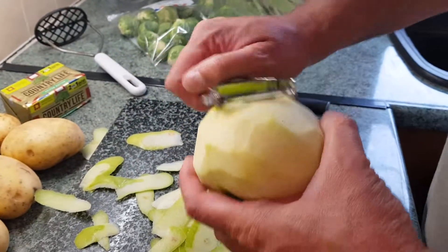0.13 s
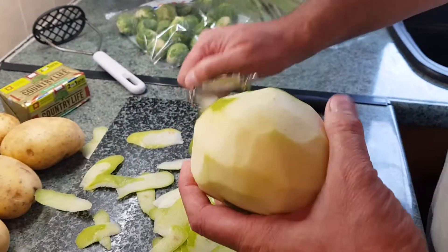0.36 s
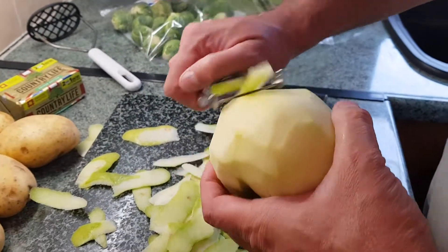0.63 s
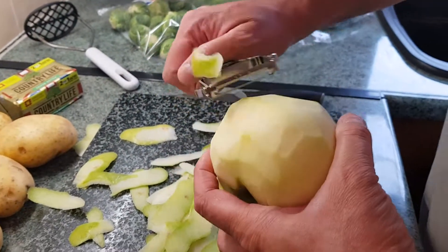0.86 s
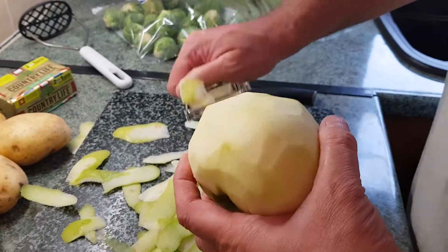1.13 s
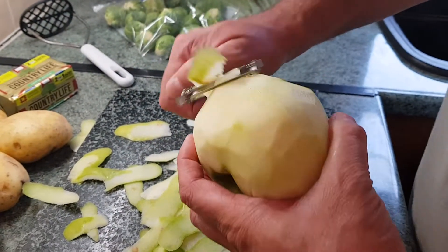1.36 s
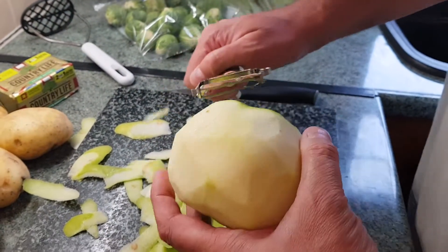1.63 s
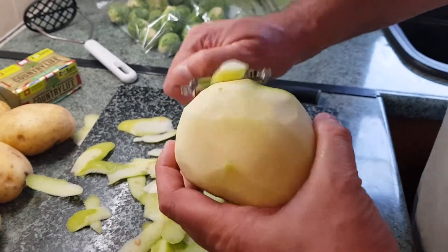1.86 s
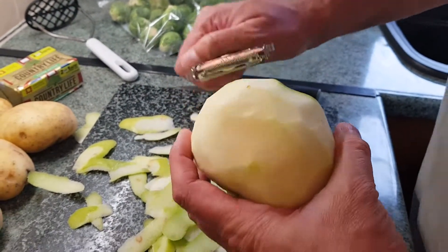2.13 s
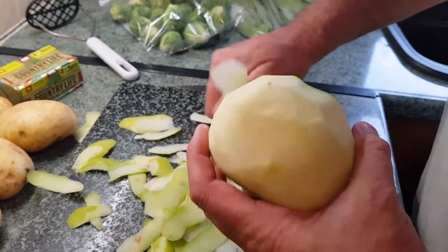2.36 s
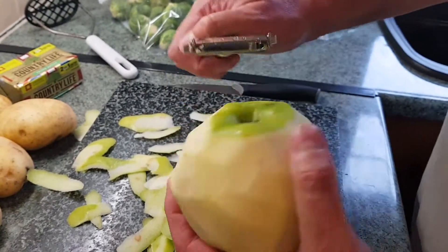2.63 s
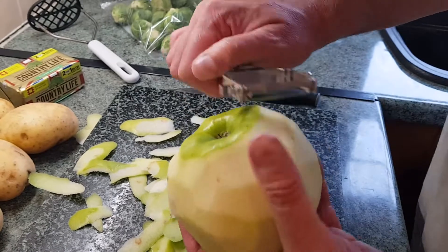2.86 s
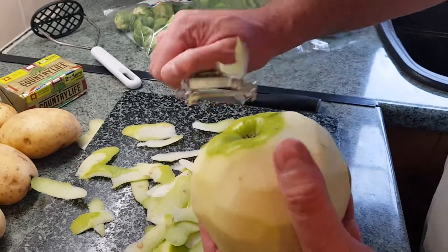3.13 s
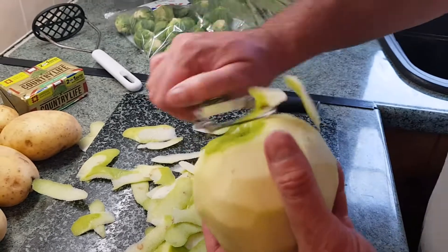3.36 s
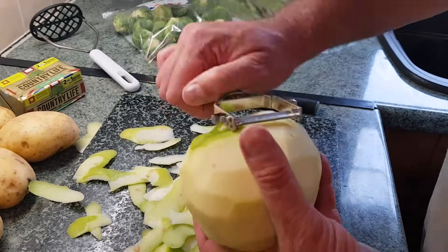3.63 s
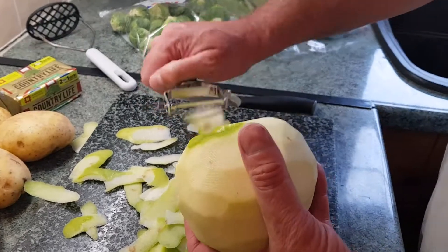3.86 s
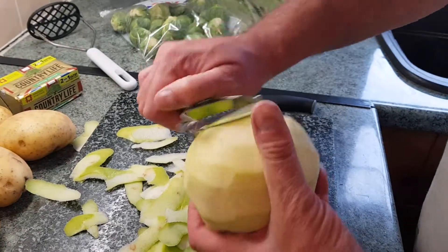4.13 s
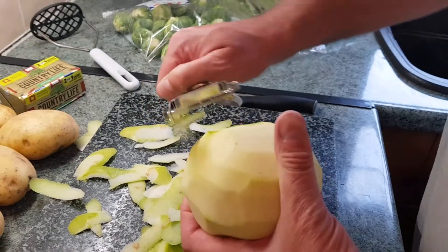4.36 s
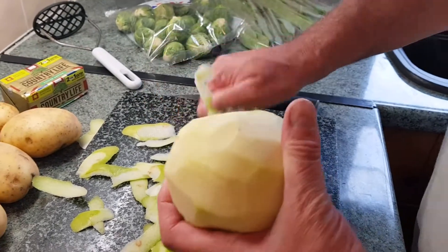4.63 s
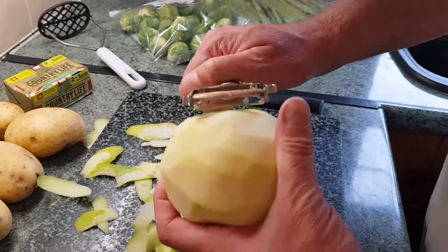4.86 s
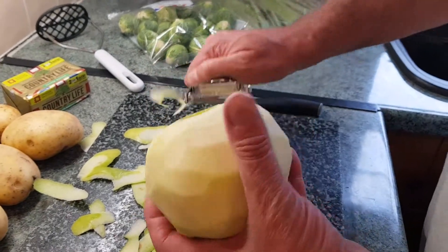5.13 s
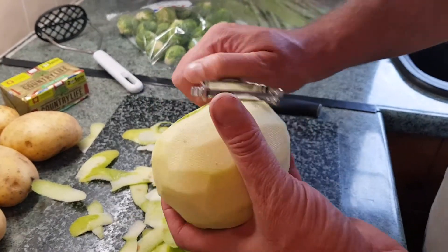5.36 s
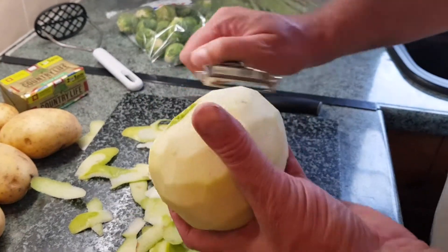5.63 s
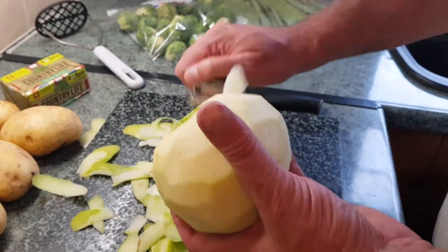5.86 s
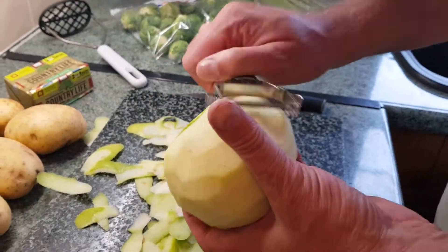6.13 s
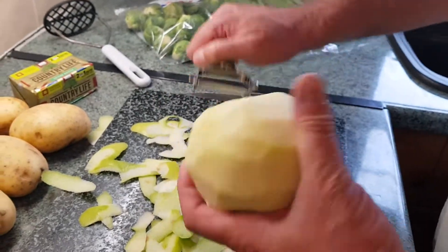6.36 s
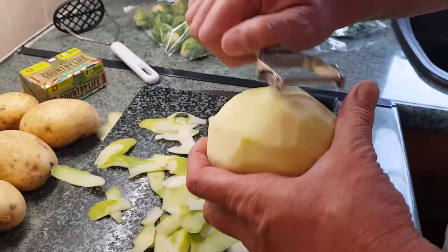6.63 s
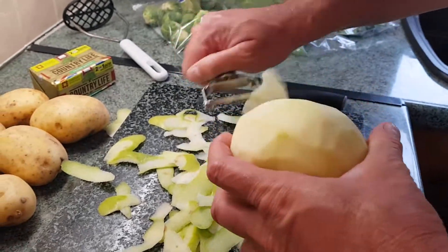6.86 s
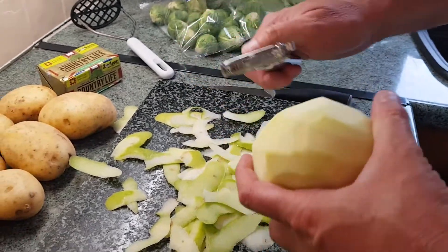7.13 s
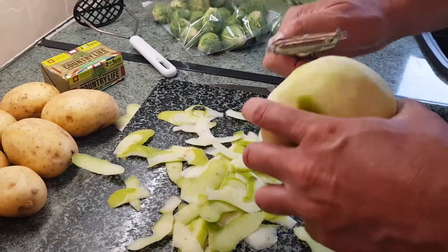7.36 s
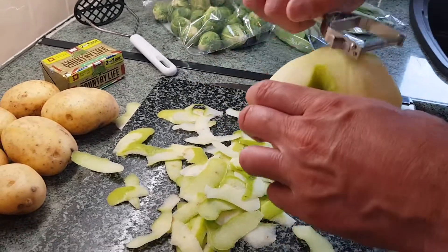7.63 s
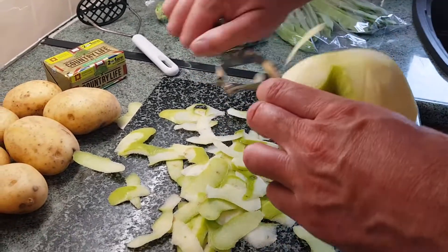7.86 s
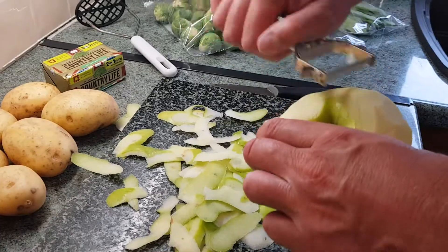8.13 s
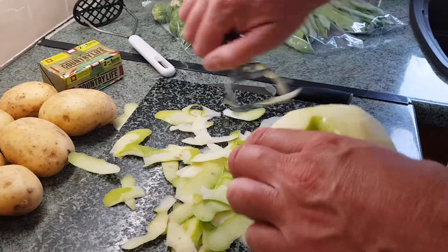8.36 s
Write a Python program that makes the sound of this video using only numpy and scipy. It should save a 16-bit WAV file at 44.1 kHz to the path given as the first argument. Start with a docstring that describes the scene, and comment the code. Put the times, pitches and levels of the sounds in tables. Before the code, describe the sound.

A loose-bladed metal peeler shaves a firm apple in quick, crisp, rasping strokes with small metallic rattles, over a faint fridge hum.

```python
"""A steel swivel peeler shaves an apple on a stone worktop, close to a two-port microphone.
Each stroke tears fruit cells: random impulses excite the resonances of blade and hollow-sounding apple.
The loose blade chatters in its pivots (short swarms of contacts) and rustles with wet peel between cuts.
A faint whistle and an early drone pass; a fridge hums, its motor beating against the mains, over room noise.
"""
import sys
import numpy as np
from scipy import signal
from scipy.fft import rfft, irfft, next_fast_len
from scipy.io import wavfile
from scipy.ndimage import uniform_filter1d, map_coordinates

SR = 44100
rng = np.random.default_rng(int(sys.argv[2]) if len(sys.argv) > 2 else 0)


def to_wav(sig):
    """Store sig (one row per channel, or 1-D mono) as 16-bit WAV at the path in sys.argv[1].

    Samples outside -1..1 are clipped; the rate is SR.
    """
    pcm = np.clip(np.atleast_2d(sig), -1, 1) * 32767
    pcm = np.round(pcm).astype(np.int16)
    wavfile.write(sys.argv[1], SR, pcm.T)  # frames by channels


def ratio(d):
    """dB to gain"""
    e = np.asarray(d, float) / 20
    return 10 ** e


N = 374850

# Apple and hand resonances, the three low ones first.
# Each row: centre in Hz, width in Hz, peak gain in dB (relative).
APPLE_MODES = [(720, 198, -8.5), (871, 38, 0.5), (1135, 170, -5), (1483, 200, -9.5), (1800, 250, -6),
               (2053, 184, -1.5), (2537, 750, -5.5)]


def unit(x):
    """Scaled to rms 1."""
    return x / np.sqrt(np.mean(x ** 2) + 1e-20)


def along(points, hz):
    """(Hz, value) points interpolated on a log frequency axis."""
    point_hz, value = np.transpose(points)
    return np.interp(np.log(hz + 1), np.log(point_hz + 1), value)


def wobble(rate_hz):
    """A smooth random curve with rate_hz knots a second."""
    knots = rng.standard_normal(int(N * rate_hz / SR) + 4)
    return map_coordinates(knots, [np.arange(N) * rate_hz / SR])


def filtered(x, response):
    """x times a complex response of frequency."""
    size = next_fast_len(N + SR // 2)
    spectrum = rfft(x, size) * response(np.fft.rfftfreq(size, 1 / SR))
    return irfft(spectrum, size)[..., :N]


def resonant(x, modes):
    """x through parallel causal second-order resonances of alternating sign."""
    def response(f):
        total = 0
        for k, (centre_hz, width_hz, db) in enumerate(modes):
            damping = 1j * f * width_hz
            total = total + (-1) ** k * ratio(db) * damping / (centre_hz ** 2 - f * f + damping)
        return total
    return filtered(x, response)


def grit(rate_hz, scatter_db):
    """Dense random impulses of uneven size, rms 1."""
    struck = rng.random(N) < rate_hz / SR
    size = ratio(scatter_db * np.minimum(rng.exponential(size=N), 5))
    return unit(struck * rng.standard_normal(N) * size)


def strokes():
    """Gains of blade, deep and crisp flesh from cuts and rustles; smoothed 0-1 mark of the cutting."""
    # Peeling cuts. Each row: edge enters, deepest, edge leaves in seconds; blade scrape on entry and
    # at the deepest in dB; deep and crisp flesh over the blade at the deepest in dB.
    cuts = [(.13, 0.23, 0.29, -42, -32.5, -5, -5.5), (0.581, 0.665, .69, -36, -30, -11.5, -6.5),
            (0.953, 1.039, 1.066, -37.5, -29.5, -7, -5), (1.332, 1.414, 1.448, -32, -31.5, -9.5, -5),
            (1.827, 1.9, 1.937, -32, -32.5, -5, -5.5), (2.238, 2.344, 2.373, -34, -34.5, -5.5, -3),
            (2.935, 3.015, 3.03, -32.5, -35, -0.5, -5), (3.295, 3.385, 3.4, -34, -35.5, -3.5, -2),
            (3.654, 3.747, 3.778, -40.5, -31.5, -3.5, -2.5), (4.087, 4.174, 4.223, -38.5, -36, -4, -3),
            (4.476, 4.59, 4.615, -36, -33.5, -5, -4.5), (4.918, 4.995, 5.043, -47.5, -30, -5, -2.5),
            (5.354, 5.42, 5.44, -30.5, -34.5, -10, -4.5), (5.735, 5.805, 5.84, -48, -32.5, -8, -2),
            (6.15, 6.245, 6.27, -35, -34, -10, -4), (6.69, 6.79, 6.825, -39, -31, -8, -3.5),
            (7.725, 7.798, 7.825, -46.5, -33.5, -10, -1.5), (8.227, 8.302, 8.39, -49.5, -35.5, -7, -0.5)]
    # Loose blade and wet peel, each until the next cut.
    # Each row: start in seconds, level in dB, fade in dB per second (negative grows).
    rustles = [(0, -44, 185), (.115, -40, 300), (.335, -41, 195), (.5, -53, 98), (.7, -43, 90),
               (.915, -49.5, 500), (1.1, -36.5, 200), (1.21, -53, 150), (1.45, -39.5, 133),
               (1.689, -50.5, 500), (1.95, -50, 80), (2.4, -42, 110), (3.045, -42, 124), (3.235, -44, 503),
               (3.41, -40, 134), (3.8, -47, 118), (4.22, -40, 188), (4.365, -53.5, -27),
               (4.625, -39.5, 203), (4.69, -52, 160), (4.905, -38, 600), (5.025, -41, 131),
               (5.46, -41, 147), (5.661, -33, 230), (5.855, -45, 153), (6.035, -48, 350), (6.285, -42, 146),
               (6.549, -48.5, 190), (6.83, -40, 300), (6.89, -42, 200), (7.11, -42, 400),
               (7.155, -48.5, 390), (7.32, -58, 497), (7.375, -62, 60), (7.675, -37, 185),
               (7.846, -35, 200), (8.01, -59.5, 103), (8.4, -56.5, -150)]
    enter_s, leave_s, swing_db = 0.015, 0.012, 22  # ramps outside a cut, and their depth
    leaving_db = -2.5  # blade as the edge leaves, over the deepest point
    # flesh share on entry and exit, over its share at the deepest point
    deep_entry_db, deep_exit_db = -7, -17.5
    crisp_entry_db, crisp_exit_db = -0.5, -14.5
    rustle_rise_s, uneven_db = 0.009, 1.5 * wobble(30)
    rustle_share_db = [[0], [-16.5], [-13]]  # blade, deep, crisp

    t = np.arange(N) / SR
    gains, cutting = np.zeros((3, N)), np.zeros(N)
    for enter, deepest, leave, entry_db, full_db, deep_db, crisp_db in cuts:
        now = slice(round((enter - enter_s) * SR), round((leave + leave_s) * SR))
        knots_s = [enter - enter_s, enter, deepest, leave, leave + leave_s]
        exit_db = full_db + leaving_db

        def shape(a, b, c):
            return np.interp(t[now], knots_s, [a - swing_db, a, b, c, c - swing_db])
        blade = shape(entry_db, full_db, exit_db)
        deep = shape(entry_db + deep_db + deep_entry_db, full_db + deep_db,
                     exit_db + deep_db + deep_exit_db)
        crisp = shape(entry_db + crisp_db + crisp_entry_db, full_db + crisp_db,
                      exit_db + crisp_db + crisp_exit_db)
        gains[:, now] += ratio([blade, deep, crisp])
        cutting[round(enter * SR):round(deepest * SR)] = 1

    for start, db, fade in rustles:
        stop = min([cut[0] for cut in cuts if cut[0] > start] + [N / SR])
        now = slice(round(max(start - rustle_rise_s, 0) * SR), round(stop * SR))
        rise = np.clip(1 + (t[now] - start) / rustle_rise_s, 0, 1)
        level = rise * ratio(db - fade * (t[now] - start) + uneven_db[now])
        gains[:, now] += level * ratio(rustle_share_db)
    return gains, uniform_filter1d(cutting, size=SR // 25)


def steel(force, hiss_db):
    """A force rings the blade; the contact also hisses, from its own random pattern of points."""
    # Blade and frame resonances. Each row: centre in Hz, width in Hz, peak gain in dB (relative).
    blade_modes = [(3593, 200, 3), (3873, 81, 2), (4220, 200, -9.5), (4870, 200, -1.5), (5120, 430, -14.5),
                   (6190, 140, 1), (9340, 370, -18), (10440, 150, -11.5), (11610, 210, -1.5),
                   (14000, 300, -4.5), (15160, 520, -2)]
    # Hiss of tearing cells. Each row: frequency in Hz, density in dB per Hz (relative).
    hiss_spectrum = [(1290, -54.5), (2200, -14), (2920, -10.5), (3710, 3), (4310, -3), (4800, 1),
                     (6260, -8), (7710, -14.5), (11500, -6.5), (15000, -10), (16000, -48)]

    def colour(hz):
        return ratio(along(hiss_spectrum, hz))
    hiss = filtered(force * rng.choice([-1, 1], N), colour)
    impulse = np.eye(1, N)[0]
    scale = np.std(resonant(impulse, blade_modes)) / np.std(filtered(impulse, colour))
    return resonant(force, blade_modes) + ratio(hiss_db) * scale * hiss


def scrape():
    """Cells burst under the edge in clumps; the flesh answers lower than the steel."""
    (blade_gain, deep_gain, crisp_gain), cutting = strokes()
    slip_db = 1.03 * wobble(150)  # the edge catches and lets go
    blade = unit(steel(grit(14000, scatter_db=1.46) * ratio(slip_db), hiss_db=3))
    tearing = grit(4000, scatter_db=0.86) * ratio(slip_db + 1.3 * wobble(45))
    deep = unit(resonant(tearing, APPLE_MODES[:3]))
    crisp = unit(resonant(tearing, APPLE_MODES[3:]))
    cut = blade_gain * blade + deep_gain * deep - crisp_gain * crisp
    cut_pan_db, free_pan_db = -0.1, -1.5  # left over right, on and off the apple
    return cut, free_pan_db + (cut_pan_db - free_pan_db) * cutting


def chatter():
    """Each jolt is a swarm of metal contacts with a knock in the fruit; the point hit sets the colour."""
    # Each row: start in seconds, low blade modes in dB, apple knock over them in dB,
    # treble over them in dB, length in seconds.
    jolts = [(0.092, -39, -8.5, 3.5, .014), (0.104, -38.5, -6, 1, .014), (0.3256, -46, -6, 5, 0.013),
             (0.34, -41, -14, 0.5, .013), (0.498, -52, -12, 4, .016), (0.557, -33, -8, 1, 0.012),
             (0.566, -20.5, -22, .5, 0.02), (.6309, -39, -8, -9, 0.021), (.7254, -44.5, -21, 2.5, 0.035),
             (0.773, -44.5, -20, 0.5, 0.035), (0.943, -26.5, -14, -3, 0.016), (0.992, -36, -2, -3, 0.028),
             (1.0489, -35, -22, 4, .0127), (1.102, -42.5, -20, 4.5, 0.042), (1.2133, -42.5, -2, 4.5, .007),
             (1.3174, -31, -17, 0, 0.0089), (1.3283, -29.5, -5, 1.5, 0.0079), (1.4245, -32, -25, 7.5, .02),
             (1.686, -56.5, 0, -2, .0099), (1.799, -34, -13, 3, .019), (1.8137, -22.5, -4, -1.5, 0.0067),
             (1.9265, -28, -19, 1.5, 0.011), (2.023, -47, -7, -2, .013), (2.203, -42, -13, 1, 0.044),
             (2.2266, -27.5, 4.5, 5, 0.0094), (2.362, -37, -18, 1, 0.03), (2.4303, -41, -15, -1, 0.021),
             (2.8856, -48, -13, 1, 0.017), (2.9064, -32, -14, 0, .012), (2.917, -23.5, -16, -3, 0.0076),
             (2.9224, -26, -10.5, -2.5, 0.023), (2.937, -23.5, -5, -1, 0.01), (2.974, -33, -3, -11, .024),
             (3.03, -31, -20, -2, .022), (3.2334, -42.5, -21, -8, 0.016), (3.2718, -21.5, -10, -3, .014),
             (3.2826, -21.5, -5, 1.5, 0.011), (3.4016, -28, -25, -1.5, 0.014), (3.615, -54, -6, -2, .012),
             (3.624, -32, -8, -1.5, 0.014), (3.635, -25.5, -14, -2, 0.016), (3.783, -37.5, -10, 5.5, .0111),
             (3.828, -47, -12, 4, 0.016), (3.8654, -45, -7, -6, .012), (4.059, -29, -11.5, 1, .016),
             (4.072, -25.5, -7, -5.5, 0.013), (4.15, -34, -2, -14, 0.019), (4.2, -37.5, -12, 0, 0.012),
             (4.2915, -43, -9, -4, 0.012), (4.356, -50, -20, -6, .012), (4.3714, -47, -25, -3, .0117),
             (4.3984, -49, -22, -2, 0.027), (4.4433, -36.5, -8, 1, 0.021), (4.4617, -28.5, -17, 3.5, 0.01),
             (4.4925, -27, -26, -2.5, 0.01), (4.555, -33, -2.5, -9, 0.028), (4.605, -34, -20, 1, 0.03),
             (4.6554, -43, -17, 0, 0.019), (4.692, -29.5, -21, -3, 0.011), (4.748, -41.5, -16, -5, .0091),
             (4.8915, -39.5, -10, 3.5, 0.022), (4.949, -39, 0.5, -14, 0.033),
             (4.987, -23, -10.5, -3, .0095), (5.034, -34, -15, .5, 0.011), (5.088, -43, -8, 2, 0.023),
             (5.312, -43, -20, -1, .018), (5.3322, -29, -16, -0.5, .0075), (5.341, -27, -17, -0.5, 0.022),
             (5.4439, -35.5, -13, 2, 0.017), (5.495, -40, -19, 2.5, 0.025),
             (5.6468, -29.5, -18, -1.5, 0.018), (5.7086, -37.5, -7.5, 0.5, 0.0084),
             (5.76, -38, 1.5, -8, 0.03), (5.838, -31.5, -24, .5, 0.018), (5.898, -48, -9, 2, 0.0084),
             (6.036, -45, -20, 3.5, 0.012), (6.113, -33, -12.5, 0.5, .018), (6.1297, -23, -15, 0.5, 0.015),
             (6.273, -27.5, -19, -2, 0.0097), (6.34, -44, -9, 1, 0.015), (6.55, -44, -27, -4, 0.0083),
             (6.649, -37.5, -10.5, 0, 0.038), (6.671, -26.5, -15, -3, 0.01), (6.823, -34, -11, -7, .012),
             (6.878, -39, -21, 2, 0.029), (6.92, -44, -20, 1, .02), (7.0965, -39, -30, -4, .02),
             (7.156, -45, -15, 1.5, 0.014), (7.286, -58, -8, 0, .019), (7.3645, -34, -7, 0.5, .0045),
             (7.4386, -57, -10, -7, .02), (7.606, -56, -3, -6, .0149), (7.632, -38, -22, -5, 0.028),
             (7.6626, -25.5, -11.5, -3.5, 0.0097), (7.7567, -36.5, -1, -10, 0.024),
             (7.7791, -35, -7, -13, 0.038), (7.829, -26, -15, -3.5, 0.012), (8.001, -51.5, -7, -11, .0148),
             (8.221, -45, -14, -2, 0.017), (8.236, -41, -11, 2, 0.013), (8.265, -40.5, -.5, -9, .024),
             (8.295, -35.5, 0, -20, 0.036), (8.35, -37, -10, -9, .0142)]
    attack_share = 0.025  # rise time constant over length
    first_touch_db, sharp_s = 10.5, 0.0079  # first contact stands out, the more the shorter the jolt
    bands_hz = [(2200, 5120), (5400, 6740), (7400, 14500)]  # low modes, upper ring, treble

    t = np.arange(SR // 10) / SR
    force = np.zeros((4, N + len(t)))
    for start, db, knock_db, treble_db, length in jolts:
        # the upper ring follows the treble; contact with the apple damps it
        ring_db = -4 + 0.9 * treble_db - 0.12 * (knock_db + 10)
        decay = np.exp(-(t / np.clip(length, 0.002, 0.04)) ** 2.66)
        shape = decay * (1 - np.exp(-t / (attack_share * length)))
        first_touch = np.exp(-(length / sharp_s) ** 2 - t / 0.00066)
        shape = shape * (1 + ratio(first_touch_db) * first_touch)
        part_db = db + np.array([[knock_db], [0], [ring_db], [treble_db]])
        force[:, round(start * SR):][:, :len(t)] += ratio(part_db) * shape

    contacts = grit(12000, scatter_db=0.84)
    out = resonant(force[0, :N] * contacts, APPLE_MODES) / np.std(resonant(contacts, APPLE_MODES))
    for push, edges_hz in zip(force[1:, :N], bands_hz):
        band = signal.butter(2, edges_hz, "band", fs=SR, output="sos")

        def ring(x):
            return signal.sosfilt(band, steel(x, hiss_db=-1.0))
        out = out + ring(push * contacts) / np.std(ring(contacts))
    return out


def echoes(t60_s, length_s, count):
    """Random decaying responses of energy 1, count of them for each port."""
    noise = rng.standard_normal((count, 2, round(length_s * SR)))
    hz, t, z = signal.stft(noise, SR, nperseg=64)
    tail = signal.istft(z * ratio(-60 * t / t60_s(hz)[:, None]), SR, nperseg=64)[1]
    return tail / np.linalg.norm(tail, axis=-1, keepdims=True)


def kitchen(x, pan_db):
    """Moving hands and the worktop scatter the sound ever anew into each port; the walls answer later."""
    # Each row: frequency in Hz, reverberation time t60 in seconds.
    wall_t60 = [(500, 0.48), (3000, 0.43), (8000, 0.38), (15000, 0.17)]
    hop = 2048
    count = N // hop + 2
    near = ratio(-2) * echoes(lambda hz: 0.025 + 0 * hz, 0.02, count=count)
    # direct sound: the moving hand is nearer one port than the other
    lag_samples = rng.integers(0, 9, size=count)
    near[:, 0, 1] += ratio(-4.5)
    near[np.arange(count), 1, lag_samples] += ratio(-4.5)
    far = echoes(lambda hz: along(wall_t60, hz), 0.45, count=8)
    far = np.pad(far, ((0, 0), (0, 0), (250, 0)))  # delay in samples

    padded = np.pad(x, (hop, 3 * hop))
    fade = np.sin(np.pi * np.arange(2 * hop) / (2 * hop)) ** 1.49
    close, walls = np.zeros((2, 2, N + SR))
    for k in range(count):
        piece = (padded[k * hop:][:2 * hop] * fade)[None]
        for out, response in (close, near[k]), (walls, far[k % 8]):
            answer = signal.fftconvolve(piece, response, axes=1)
            out[:, k * hop:][:, :answer.shape[1]] += answer
    pan = ratio(np.array([[0.5], [-0.5]]) * pan_db)
    return pan * close[:, hop:][:, :N] + ratio(-11.0) * walls[:, hop:][:, :N]


def whistle():
    """Two thin, slightly unsteady tones while the apple is turned."""
    # Each row: frequency in Hz, relative level in dB.
    partials = [(2200, -6), (2680, -4)]
    # Each row: time in seconds, level in dB.
    envelope = [(7.4, -95), (7.43, -67.5), (7.53, -68), (7.62, -66), (7.65, -95)]
    tones = np.zeros(N)
    for hz, db in partials:
        level = ratio(db + 3 * wobble(40))
        phase = 2 * np.pi * np.cumsum(hz * (1 + 0.014 * wobble(100))) / SR
        tones += level * np.sin(phase)
    time_s, level_db = np.transpose(envelope)
    return ratio(np.interp(np.arange(N) / SR, time_s, level_db, -200, -200)) * unit(tones)


def drone():
    """A narrow band of noise, twice through a resonance, that fades away early."""
    # Each row: centre in Hz, width in Hz, relative gain in dB.
    drone_modes = [(672, 49, 0)]
    # Each row: time in seconds, level in dB.
    envelope = [(0, -62), (.15, -51.5), (.45, -57), (.56, -68), (.7, -91)]
    narrow = resonant(resonant(rng.standard_normal(N), drone_modes), drone_modes)
    time_s, level_db = np.transpose(envelope)
    return ratio(np.interp(np.arange(N) / SR, time_s, level_db, right=-200)) * unit(narrow)


def rush(spectrum):
    """Stereo noise of rms 1, alike in the bass: mid and side shares set the port correlation."""
    # Each row: frequency in Hz, left-right correlation.
    likeness = [(60, 0.96), (150, 0.89), (380, 0.67), (950, 0.33), (2380, -0.48), (5980, 0.28),
                (15000, 0.01)]

    def response(hz):
        angle = np.arccos(np.clip(along(likeness, hz), -1, 1)) / 2
        return ratio(along(spectrum, hz)) * [np.cos(angle), np.sin(angle)]
    mid, side = filtered(rng.standard_normal((2, N)), response)
    return unit(np.array([mid + side, mid - side]))


def fridge():
    """Mains and motor tones, close pairs beating, over the rumble and hiss of the room."""
    # Each row: frequency in Hz, relative level in dB, time in seconds at which a pair swells.
    hum = [(48.68, -60, .1), (49.4, -62, .1), (98.81, -58, .25), (100.18, -53, .25), (200.34, -57, 0),
           (300.52, -69, 0), (304.32, -70, 0), (400.7, -68, 0)]
    # Steady kitchen noise. Each row: frequency in Hz, density in dB per Hz (relative).
    rumble_spectrum = [(25, -23.5), (35, -6.5), (47, -7), (62, -1), (85, -7.5), (120, -0.5), (150, -8.5),
                       (178, -2), (205, 1), (240, -7), (320, -6.5), (450, -12.5), (620, -12.5),
                       (900, -22.5)]
    # Each row: frequency in Hz, density in dB per Hz (relative).
    hiss_spectrum = [(470, -18.5), (800, -4.5), (953, -39.5), (1050, -8), (1260, -8.5), (1740, -9.5),
                     (4860, -16), (7000, -22.5), (8030, -29), (11100, -19.5), (16000, -21.5)]
    t = np.arange(N) / SR
    lead_rad = np.array([[0.17], [-0.17]])  # ports at different points of the standing waves
    tones = np.zeros((2, N))
    for hz, db, swell_s in hum:
        tones += np.sqrt(2) * ratio(db) * np.cos(2 * np.pi * hz * (t - swell_s) + lead_rad)
    rumble = rush([(12, -63.5)] + rumble_spectrum + [(1500, -60.0)])
    rumble = ratio(-49.5 + 1.0 * wobble(3.0)) * rumble
    return ratio(0.33) * tones + rumble + ratio(-61.5) * rush(hiss_spectrum)


def scene():
    """Peeler in the kitchen, over whistle, drone and fridge."""
    cut, pan_db = scrape()
    peeler = kitchen(cut + chatter(), pan_db)
    return peeler + whistle() * ratio([[-1.5], [1.5]]) + drone() + fridge()


def band_limit(x):
    """A steep low-pass at the top of the band."""
    return signal.sosfilt(signal.butter(12, 17000, fs=SR, output="sos"), x)


def record(dry):
    """Each port has its own colour; a steep low-pass limits the band."""
    # Each row: frequency in Hz, left over right in dB.
    port_balance = [(60, -1.5), (120, 0), (240, -1), (480, -2.5), (950, -2), (1890, -2.0), (3770, -1),
                    (7520, -3), (15000, 4.5)]
    top_hz = 15700

    def colour(hz):
        port_db = np.array([[0.5], [-0.5]]) * along(port_balance, hz)
        return ratio(port_db) / (1 + (hz / top_hz) ** 60)
    mix = filtered(dry, colour)
    return band_limit(mix)


dry = scene()
out = record(dry)
to_wav(out)
```